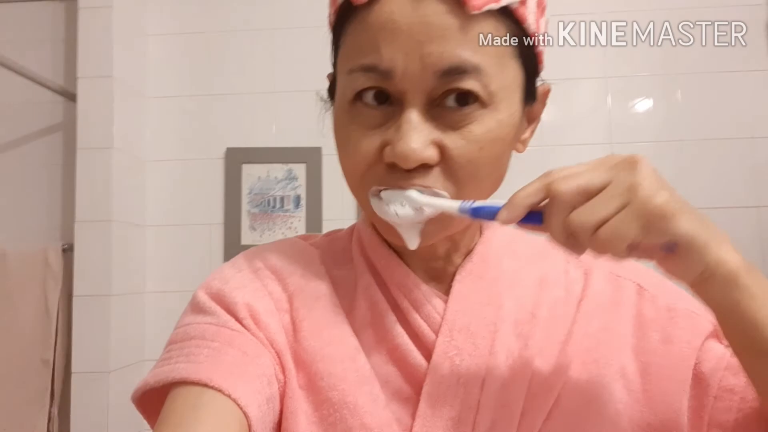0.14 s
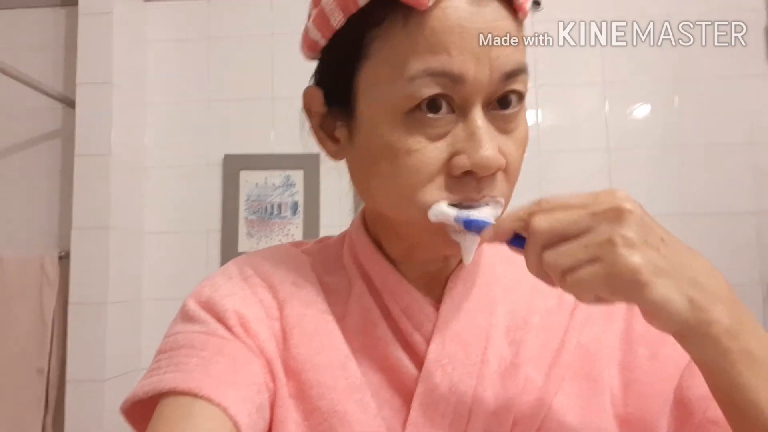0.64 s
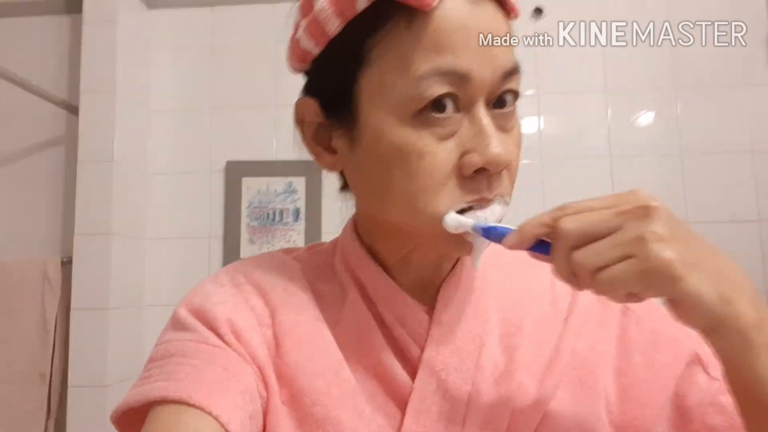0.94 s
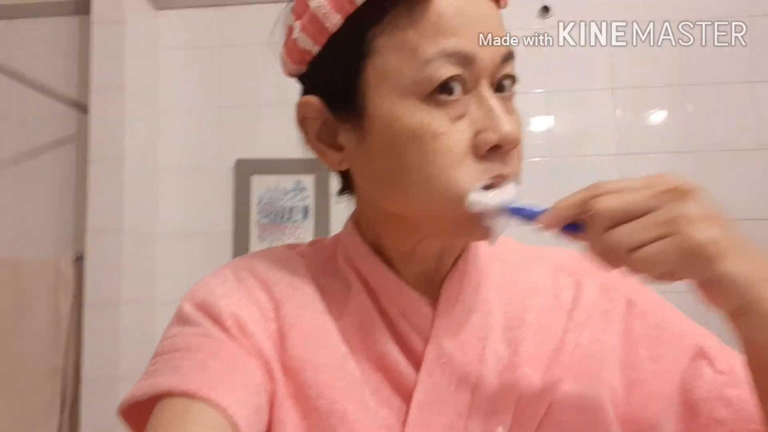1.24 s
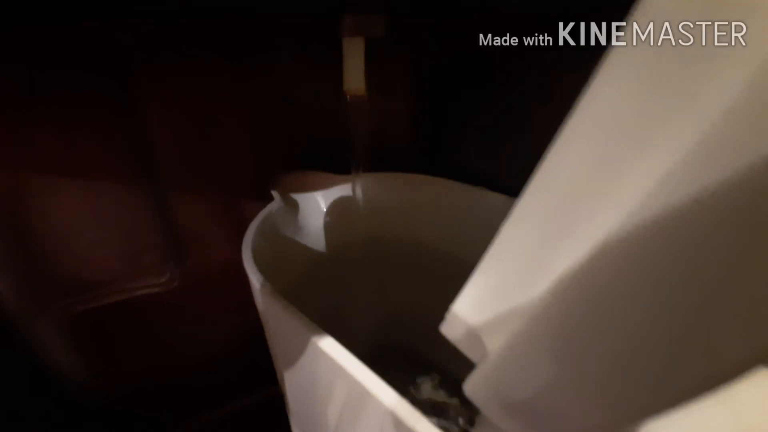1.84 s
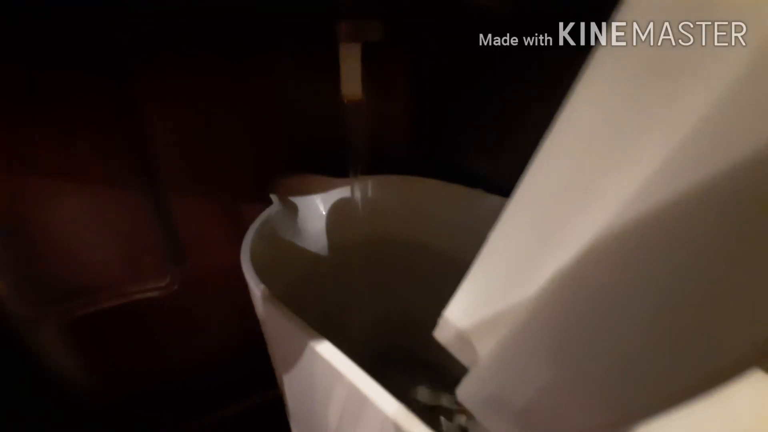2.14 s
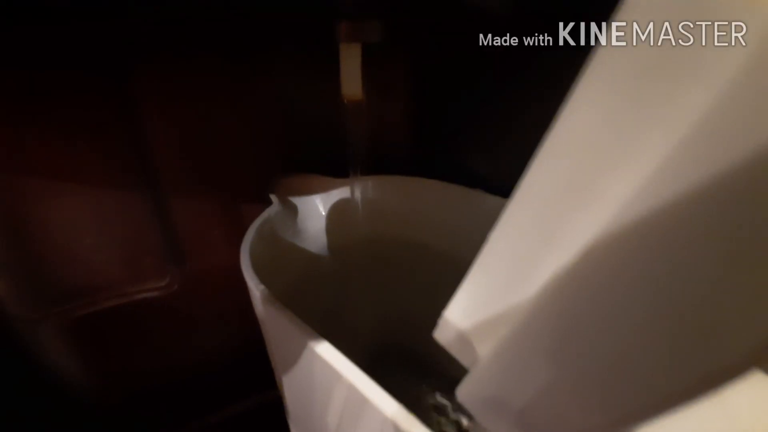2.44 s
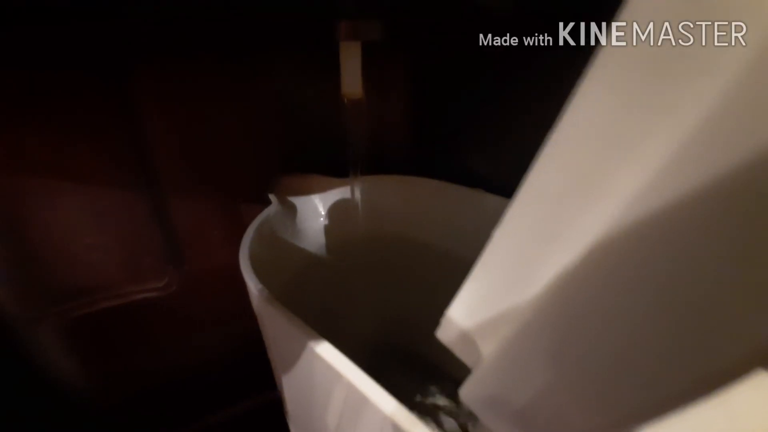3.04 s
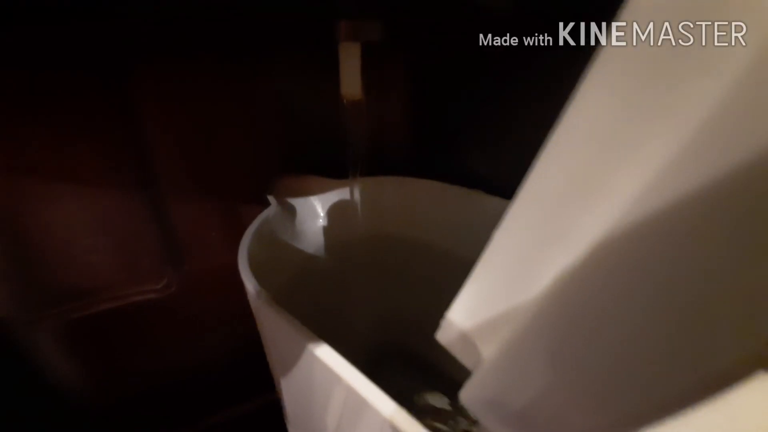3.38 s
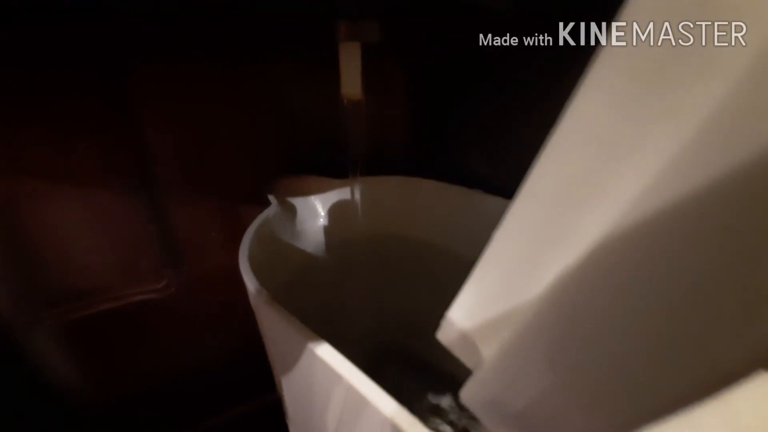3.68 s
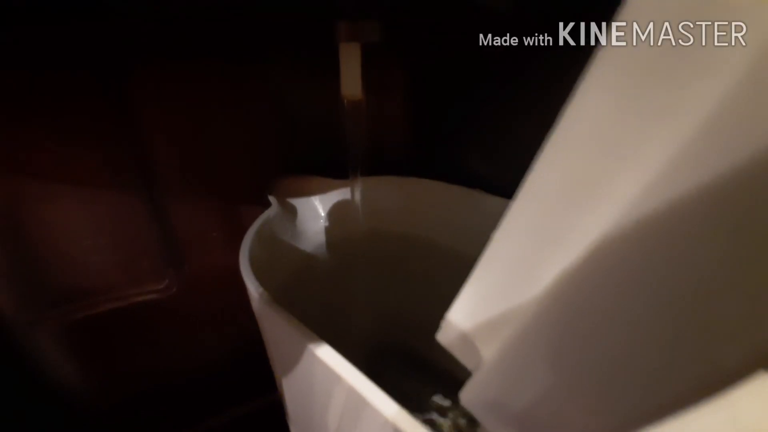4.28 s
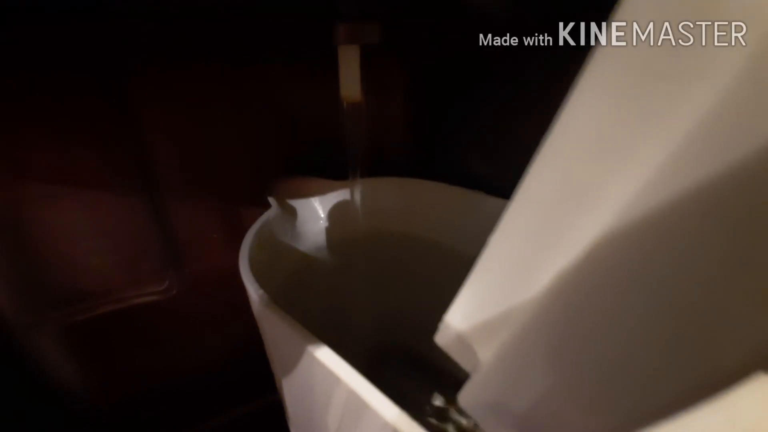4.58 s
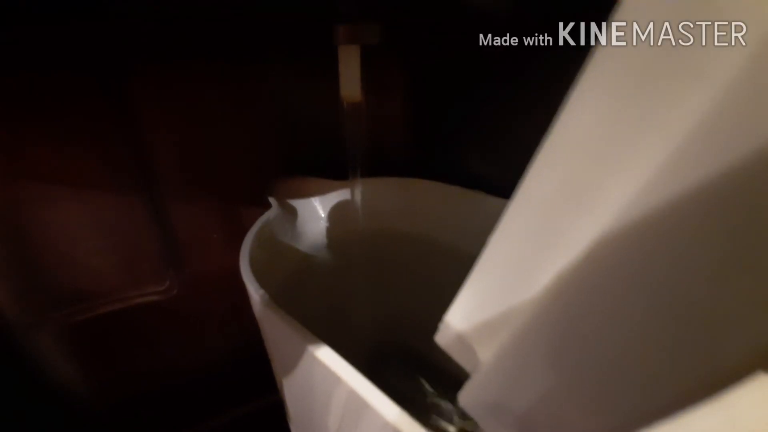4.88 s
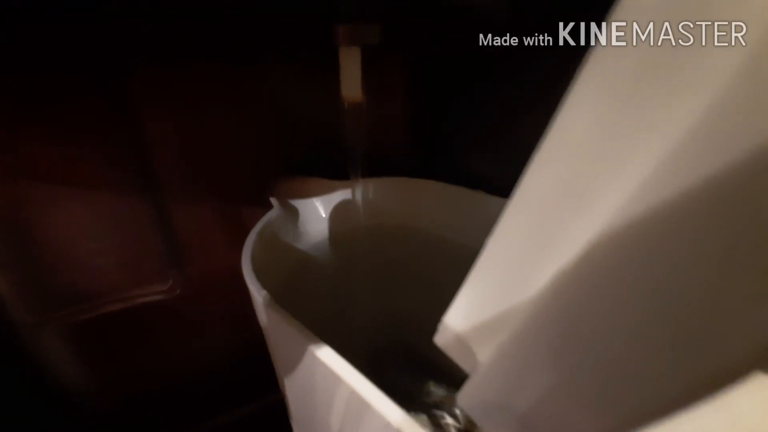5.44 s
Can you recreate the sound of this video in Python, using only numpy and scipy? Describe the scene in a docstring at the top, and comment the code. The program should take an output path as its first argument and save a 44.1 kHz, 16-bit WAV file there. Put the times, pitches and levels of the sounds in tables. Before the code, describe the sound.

Quick, wet toothbrush strokes hiss and tick close by on the left, with a short bathroom echo. They cut off and louder tap water runs into a plastic jug, well to the left, with splashing drops, gurgles and a humming motor underneath. After another brief silence, the low, even rush of a fan is heard to the end.

```python
"""Tiled bathroom: brush, tap, fan

Three moments in stereo, short silences between. Close by, left of the microphone, a toothbrush scrubs
foamy teeth while the mouth opens. Further left, a tap pours into a part-filled plastic jug: drops
spatter and trapped air rings over a motor hum. Then a steady rush, as of a fan, fills the room."""
import sys
import numpy as np
from scipy import signal
from scipy.fft import rfft, irfft, next_fast_len
from scipy.io import wavfile

SR = 44100
rng = np.random.default_rng(int(sys.argv[2]) if len(sys.argv) > 2 else 0)


def inscribe(sig):
    """Save sig as 16-bit PCM at rate SR to the path in sys.argv[1].

    A 1-D sig is mono; a 2-D sig holds one channel per row.
    Samples are clipped to [-1, 1] before scaling.
    """
    pcm = np.round(np.clip(np.atleast_2d(sig).T, -1, 1) * 32767)
    wavfile.write(sys.argv[1], SR, pcm.astype(np.int16))


N = 309563
TIME_S = np.arange(N) / SR


def amp(db):
    """Decibels to gain."""
    return 10 ** (np.asarray(db) / 20)


def rms_one(x):
    """Scale so that the mean of the channels has rms 1."""
    return x / np.sqrt(np.mean(np.atleast_2d(x).mean(axis=0) ** 2) + 1e-20)


def in_time(rows):
    """One curve over time for each column after the first, time_s."""
    times, *columns = np.transpose(rows)
    return [np.interp(TIME_S, times, column) for column in columns]


def during(start_s, end_s, fade_in_s, fade_out_s=0.022):
    """1 inside a span, 0 outside, with straight fades."""
    return np.clip((TIME_S - start_s) / fade_in_s, 0, 1) * np.clip((end_s - TIME_S) / fade_out_s, 0, 1)


def bins():
    """Frequencies of the padded FFT grid."""
    return np.linspace(1e-3, SR / 2, next_fast_len(N // 2 + 8192) + 1)


def at_bins(points):
    """Points (freq_hz, value) joined by straight lines on a log axis."""
    hz, value = np.transpose(points)
    return np.interp(np.log(bins()), np.log(np.sort(hz)), value)


def colour(x, curve_db):
    """Causal (minimum-phase) filter with the given gain on the FFT grid."""
    cepstrum = irfft(np.log(amp(curve_db)))
    size = len(cepstrum)
    cepstrum[1:size // 2] *= 2
    cepstrum[size // 2 + 1:] = 0
    return irfft(rfft(x, size) * np.exp(rfft(cepstrum)))[..., :N]


def drift(rate_hz):
    """A slow random curve with rms 1."""
    step, settle = 40, 2000
    r = np.exp(-2 * np.pi * rate_hz * step / SR)
    noise = rng.standard_normal(N // step + settle + 2)
    slow = signal.lfilter([1], [1, -2 * r, r * r], noise)[settle:]
    return np.interp(np.arange(N) / step, np.arange(len(slow)), rms_one(slow))


def place(x, balance):
    """Share each frequency between the left and right microphone channels."""
    ratio = amp(at_bins(balance))
    size = 2 * (len(ratio) - 1)
    gains = np.array([ratio, np.ones_like(ratio)]) * np.sqrt(2 / (1 + ratio ** 2))
    return irfft(rfft(x, size) * gains)[:, :N]


# How alike the room's diffuse sound is in the two channels: freq_hz, correlation
ROOM_LIKENESS = [(60, 0.98), (150, 0.8), (300, 0.65), (640, 0.26), (1400, 0), (5000, 0)]

def diffuse(spectrum, balance):
    """Stereo noise, alike in the bass and unrelated in the treble; rms 1."""
    alike = at_bins(ROOM_LIKENESS)
    mid, wide = rfft(rng.standard_normal((2, 2 * (len(alike) - 1)))) * amp(at_bins(spectrum))
    stereo = irfft(np.sqrt(1 + alike) * mid + np.sqrt(1 - alike) * wide * [[1], [-1]])
    return rms_one(place(stereo[:, :N], balance))


def tile_echoes(x, t60_s, wet_db):
    """Dense dying reflections off the tiles, different in each channel; the power stays the same."""
    t = np.arange(SR // 2) / SR
    tail = rng.standard_normal((2, len(t))) * amp(-60 * t / t60_s) * (t > .0006)
    tail *= amp(wet_db) / np.sqrt(np.sum(tail ** 2, axis=1, keepdims=True))
    tail[:, 0] = 1  # the direct sound
    return signal.fftconvolve(np.atleast_2d(x), tail, axes=1)[:, :N] / np.hypot(1, amp(wet_db))


def add(out, start_s, sound):
    """Mix in a short stereo sound."""
    i = int(np.clip(start_s * SR, 0, N - 1))
    out[:, i:i + sound.shape[1]] += sound[:, :N - i]


def chance_times(per_s):
    """Random moments over the whole scene."""
    return np.flatnonzero(rng.random(N) < per_s / SR) / SR


def swarm(per_s, low_hz, high_hz, spread_db):
    """Random drops or bubbles, the quiet ones more common: start_s, level_db, pitch_hz."""
    times = chance_times(per_s)
    faintness, pitch = rng.random((len(times), 2)).T
    return np.column_stack([times, -spread_db * np.sqrt(faintness), low_hz * (high_hz / low_hz) ** pitch])


def bursts(times, levels_db, t60_s):
    """Noise bursts that start at once and die away."""
    kicks = np.zeros(N)
    kicks[np.clip(times * SR, 0, N - 1).astype(int)] = amp(levels_db) ** 2
    power = signal.lfilter([1], [1, -amp(-120 / (t60_s * SR))], kicks + 1e-18)
    return np.sqrt(power) * rng.standard_normal(N)


def rings(rows, cycles, rise, swell_cycles):
    """Damped sines (start_s, level_db, pitch_hz) that swell and glide up, each with its stereo phase."""
    out = np.zeros((2, N))
    for (start_s, db, hz), (stretch, steepness, side) in zip(rows, rng.uniform(-1, 1, (len(rows), 3))):
        life_cycles = cycles * amp(4.7 * stretch)
        turns = np.arange(0, life_cycles, hz / SR)
        age = turns / life_cycles
        shape = amp(-60 * age) * (1 - np.exp(-turns / swell_cycles))
        glide = rise * (1 + steepness / 2)
        phase = 2 * np.pi * turns * (1 + glide * (age - 1 / 3) / 2)
        add(out, start_s, amp(db) * shape / shape.max() * np.sin([phase, phase + side * hz / 500]))
    return out


def splashes(rows, t60_s, attack_s, tone, width_hz, alike=0):
    """Noise bursts (start_s, level_db, pitch_hz), each with a resonance; `alike` correlates channels."""
    out, r = np.zeros((2, N)), np.exp(-np.pi * width_hz / SR)
    for (start_s, db, hz), stretch in zip(rows, rng.uniform(-1, 1, len(rows))):
        life_s = t60_s * amp(3 * stretch)
        t = np.arange(0, life_s, 1 / SR)
        shape = amp(-60 * t / life_s) * (1 - np.exp(-(t / attack_s) ** 2))
        mid, wide = rng.standard_normal((2, len(t)))
        noise = np.sqrt((1 + alike) / 2) * mid + np.sqrt((1 - alike) / 2) * wide * [[1], [-1]]
        noise *= shape / shape.max()
        poles = [1, -2 * r * np.cos(2 * np.pi * hz / SR), r * r]
        ring = signal.lfilter([1, 0, -1], poles, noise) * np.sqrt((1 - r * r) / 2)
        add(out, start_s - attack_s / 2, amp(db) * (noise + tone * ring) / np.hypot(1, tone))
    return out


def cavity(x, centre_hz, width_hz):
    """A moving resonance, stepped in short blocks."""
    out, state, r = np.zeros(N), np.zeros(2), np.exp(-np.pi * width_hz / SR)
    for i in range(0, N, 256):
        poles = [1, -2 * r * np.cos(2 * np.pi * centre_hz[i] / SR), r * r]
        out[i:i + 256], state = signal.lfilter([1, 0, -1], poles, x[i:i + 256], zi=state)
    return out


def mouth_ring(flicks, mouth_hz):
    """Two mouth resonances move together; each acts twice, which leaves dark valleys."""
    lower, upper = (rms_one(cavity(cavity(flicks, hz, width_hz), hz, width_hz))
                    for hz, width_hz in [(mouth_hz, 500), (1.31 * mouth_hz, 800)])
    return lower + amp(-4) * upper


# Brush strokes at their hardest contact; frontness runs from 0 (back teeth) to 1 (front teeth):
# contact_s, hiss_db, mouth_db, mouth_hz, frontness, length_s
BRUSH_STROKES = [(0.012, -57.5, -78, 1110, .9, 0.18), (0.134, -54, -82, 1050, .9, .16),
                 (0.246, -56.5, -69.5, 670, .95, 0.18), (0.462, -69, -73, 616, 0.72, 0.23),
                 (0.631, -57.5, -52, 1360, 0.71, .14), (.807, -48.5, -52, 1030, 1, 0.11),
                 (0.912, -62, -49, 1120, 0.62, 0.087), (1.075, -72, -53, 1310, .15, .08),
                 (1.164, -57, -44.5, 1310, 0.16, 0.095), (1.321, -63, -54, 1340, 0.32, 0.28)]

def brush_strokes():
    """Each stroke swells and fades more slowly; mouth pitch and brush position glide between strokes."""
    depth_db, swell_share = 19.5, 0.39
    foam_start_db, foam_fade_db_per_s = -12, 33
    hiss_curves, mouth_curves = [], []
    for contact_s, hiss_db, mouth_db, _, _, length_s in BRUSH_STROKES:
        since_s = TIME_S - contact_s
        age = since_s / length_s
        stroke_db = -depth_db * np.maximum(-age / swell_share, age / (1 - swell_share))
        # foam keeps crackling in the mouth after the stroke
        foam_db = np.where(since_s > 0, foam_start_db - foam_fade_db_per_s * since_s, stroke_db)
        hiss_curves.append(hiss_db + stroke_db)
        mouth_curves.append(mouth_db + np.maximum(stroke_db, foam_db))
    _, _, mouth_hz, frontness, _ = in_time(BRUSH_STROKES)
    mouth_hz *= np.exp(0.044 * drift(18))  # cheek and tongue keep reshaping the mouth
    return np.max(hiss_curves, axis=0), np.max(mouth_curves, axis=0), mouth_hz, frontness


# Bristles on the front teeth, open to the microphone: freq_hz, gain_db
FRONT_BRISTLES = [(300, -13), (700, -1), (1300, -8.5), (2150, 10.5), (2700, -4.5), (3400, 3), (4200, 5.5),
                  (8000, 6.5), (11500, 3), (15500, -9)]
# Bristles on the back teeth, heard through the cheek: freq_hz, gain_db
BACK_BRISTLES = [(300, -7.5), (1000, -12), (2000, 7.5), (2750, 4.5), (3400, 5.5), (4500, -3.5),
                 (8000, -7.5), (10500, -24), (15500, -18)]
# The brushing, left of the microphone: freq_hz, left_minus_right_db
BRUSH_BALANCE = [(100, 10), (380, 1), (700, 5.5), (1290, 2), (2600, 8), (5000, 4.5), (15000, 5.5)]

def toothbrush():
    """Bristles flick over the teeth: a hiss that dulls behind the cheek, and the ring of the mouth."""
    hiss_db, mouth_db, mouth_hz, frontness = brush_strokes()
    times = chance_times(per_s=2200)
    flicks = bursts(times, rng.normal(0, 3.9, len(times)), t60_s=0.0029)
    bright = rms_one(colour(flicks, at_bins(FRONT_BRISTLES)))
    dull = rms_one(colour(flicks, at_bins(BACK_BRISTLES)))
    hiss = amp(hiss_db) * (frontness * bright + (1 - frontness) * amp(9) * dull)
    mouth = amp(mouth_db) * mouth_ring(flicks, mouth_hz)
    return place(tile_echoes(hiss + mouth + bristle_snaps(), t60_s=0.2, wet_db=-0.5), BRUSH_BALANCE)


# Room tone of the bathroom, behind the brushing: freq_hz, gain_db
ROOM_TONE = [(25, -23), (60, -5), (100, 3), (170, -15), (350, -20), (1000, -22.5), (4000, -24),
             (15000, -32)]

def room_air():
    """A low, uneven rumble with a faint mains hum."""
    hum = tones([(100, -74)], waver_db=2, wander_rad=.8) * amp([[2], [-6]])
    rumble = amp(-73.5) * diffuse(ROOM_TONE, BRUSH_BALANCE)
    swell_db, = in_time([(0, 0), (.65, 4), (1.1, 3), (1.38, -0.5)])
    return amp(swell_db) * (rumble + hum)


def tones(lines, waver_db, wander_rad, left_lead_rad=0):
    """Stereo tones (pitch_hz, level_db) that waver in level and phase."""
    out = np.zeros((2, N))
    for hz, db in lines:
        phase = 2 * np.pi * (hz * TIME_S + rng.random()) + wander_rad * drift(2.7)
        out += np.sqrt(2) * amp(db + waver_db * drift(2.2)) * np.sin([phase + left_lead_rad, phase])
    return out


# Tufts snapping off a tooth, close by: start_s, tick_db, mouth_db, mouth_hz
TUFT_SNAPS = [(0.1354, -35, -72, 1150), (0.2707, -34.5, -68, 700), (0.3092, -35.5, -82, 700),
              (0.4968, -38, -84, 900), (0.598, -48, -66, 1280), (0.6296, -33.5, -36, 1260),
              (0.7784, -45, -45, 1200), (0.822, -46, -54, 900), (0.8841, -37, -52, 1130),
              (0.9225, -42, -42.5, 1190), (1.078, -60, -44, 1320), (1.1704, -55, -51, 1320),
              (1.3069, -50, -55, 1400)]
# Colour of the tick: freq_hz, gain_db
TICK_COLOUR = [(200, -22), (900, -9), (2000, 0.5), (9000, 3), (15500, -10)]

def bristle_snaps():
    """A tuft slips off a tooth: a dry tick, and a short knock of the mouth."""
    start_s, tick_db, mouth_db, mouth_hz = np.transpose(TUFT_SNAPS)
    ticks = colour(bursts(start_s, tick_db, t60_s=0.0072), at_bins(TICK_COLOUR))
    knocks = rings(np.column_stack([start_s, mouth_db, mouth_hz]), cycles=13, rise=.02, swell_cycles=1)
    return amp(-4.5) * ticks + amp(7.5) * knocks


# Strength of the stream where it lands in the jug: time_s, spray_db, bubbling_db
TAP_FLOW = [(1.55, -50.5, -45.5), (1.8, -48, -50), (2.25, -48, -46.5), (2.6, -50.1, -49.5), (2.9, -48, -50),
            (3.2, -52, -51), (3.6, -52.5, -50.5), (4.0, -47, -45.5), (4.35, -47, -47), (4.7, -46.5, -47.5),
            (5.0, -46, -44), (5.5, -43.5, -47.5)]

def stream():
    """Spray, fizz and churn levels follow the flow and surge at random; plunges lift the last two."""
    flow_spray_db, bubbling_db = in_time(TAP_FLOW)
    stir = np.max([np.exp(-np.abs(TIME_S - start_s) / 0.043) for start_s, _, _ in JET_PLUNGES], axis=0)
    spray_db = flow_spray_db + 1.9 * drift(14)
    fizz_db = bubbling_db - 2.5 + 2 * drift(10) + 1.5 * stir
    churn_db = bubbling_db - 5.5 + 1.4 * drift(11) + 2.5 * stir
    return spray_db, fizz_db, churn_db


# Resonances and notches of the plastic jug: centre_hz, width_hz, gain_db
JUG_RESONANCES = [(570, 220, -2), (777, 110, 6.5), (937, 126, 11), (1176, 470, -5), (1635, 360, -3.5),
                  (2174, 530, 3.5), (2667, 90, 6), (3986, 225, -12.5), (4695, 340, 6.5), (5270, 590, -6.5),
                  (6100, 270, -7.5), (6620, 240, 7.5), (6900, 61, 0), (7460, 320, -9), (9700, 200, -3.5),
                  (12000, 160, -0.5)]
# The jug, well left of the microphone: freq_hz, left_minus_right_db
TAP_BALANCE = [(60, 5), (200, 5.6), (550, 2.3), (900, 8.6), (1290, 1.8), (2000, 9.4), (2700, 18.2),
               (4000, 11.9), (6600, 17.6), (8500, 11.6), (11000, 12.8), (15000, 14.3)]

def tap():
    """Water sounds pass through the jug's resonances; its wall drums and a motor hums."""
    spray_db, fizz_db, churn_db = stream()
    jug_db = sum(db / (1 + (2 * (bins() - hz) / width_hz) ** 2) for hz, width_hz, db in JUG_RESONANCES)
    water = colour(spray(spray_db) + bubbles(fizz_db) + churning(churn_db), jug_db)
    water = tile_echoes(water, t60_s=0.17, wet_db=-11.5)
    return place(water, TAP_BALANCE) + jug_wall() + motor_hum()


# Colour of the jug's drumming wall: freq_hz, gain_db
WALL_COLOUR = [(20, -17.5), (45, -16), (90, -7), (170, -0.5), (215, -6.5), (255, 0.5), (295, 5),
               (340, -6.5), (430, -11), (560, -12.5), (900, -16.5), (3000, -65)]

def jug_wall():
    """The plastic wall drums unevenly under the stream."""
    wall_db, = in_time([(1.5, -50), (3.2, -51.5), (4.3, -49), (5.5, -48.5)])
    return amp(wall_db + 2.24 * drift(17)) * diffuse(WALL_COLOUR, TAP_BALANCE)


# A motor beside the tap, left of the microphone: pitch_hz, level_db
MOTOR_TONES = [(60, -44.5), (100, -50.5), (120, -61.5), (149.3, -60), (167.7, -53), (180, -63.5),
               (200, -66.5), (240, -60), (249, -62), (298, -67), (500, -73.5)]

def motor_hum():
    """A motor hums in low, nearly steady tones."""
    return tones(MOTOR_TONES, waver_db=0.77, wander_rad=.08, left_lead_rad=0.57) * amp([[2.3], [-2.8]])


# Colour of the spray at the water's surface: freq_hz, gain_db
SPRAY_COLOUR = [(200, -20.5), (600, 1), (1500, -8.5), (3000, 0), (5000, -2.5), (7500, 0), (9000, -0.5),
                (12000, 2.5), (14000, 2), (15500, 0)]

def spray(spray_db):
    """The stream breaks into drops that slap the surface; tiny bubbles tinkle and the foam sizzles."""
    drops = swarm(per_s=190, low_hz=3850, high_hz=15500, spread_db=30.5)
    patter = rms_one(splashes(drops, t60_s=.017, attack_s=.004, tone=1, width_hz=1860))
    tiny_bubbles = swarm(per_s=450, low_hz=4950, high_hz=14160, spread_db=30)
    tinkle = rms_one(rings(tiny_bubbles, cycles=49, rise=.11, swell_cycles=9))
    foam = rms_one(rng.standard_normal((2, N)))
    fine_spray = amp(spray_db) * (amp(-1.36) * patter + amp(-7) * tinkle + amp(-8.5) * foam)
    return colour(fine_spray + amp(-7) * drop_slaps(), at_bins(SPRAY_COLOUR))


# The loudest drops landing in the jug: start_s, level_db, pitch_hz
BIG_DROPS = [(1.4702, -29, 10700), (1.515, -32, 12100), (1.5708, -26.5, 8000), (1.7176, -26, 10600),
             (1.954, -29.5, 4150), (2.0206, -20, 6800), (2.0537, -32, 6940), (2.104, -21.5, 11600),
             (2.2035, -24.5, 9600), (2.2865, -28, 14800), (2.3134, -25.5, 6260), (2.3565, -26, 11000),
             (2.4089, -30, 12000), (2.4704, -34, 14100), (2.5344, -36, 10600), (2.6694, -27.5, 6700),
             (2.8075, -29, 14100), (2.9376, -20.5, 4700), (2.9801, -26, 11700), (3.0185, -34, 12400),
             (3.1068, -27.5, 6610), (3.15, -30.5, 11500), (3.2645, -30.5, 10600), (3.3079, -30, 6620),
             (3.32, -32, 6800), (3.3445, -36, 12000), (3.437, -26, 10100), (3.4623, -30, 13700),
             (3.537, -30.5, 10400), (3.5788, -32, 12600), (3.7492, -21, 6500), (3.8015, -29, 6600),
             (3.8578, -28.5, 6590), (3.937, -21, 10100), (4.0538, -20, 12300), (4.1614, -28, 12100),
             (4.2584, -23, 9050), (4.3799, -28, 12900), (4.412, -25.5, 13700), (4.4945, -17.5, 6620),
             (4.6106, -26.5, 12600), (4.847, -24.5, 6600), (4.9133, -26.5, 13800), (5.1018, -32, 4770),
             (5.1332, -26.5, 11900), (5.256, -36, 14800), (5.4247, -26.5, 12100), (5.44, -22, 6760)]

def drop_slaps():
    """Each big drop slaps the surface and throws up a weaker one that lands just after it."""
    start_s, level_db, pitch_hz = np.transpose(BIG_DROPS)
    delay_s = .007 * (1 + .25 * rng.uniform(-1, 1, len(start_s)))
    rebounds = np.column_stack([start_s + delay_s, level_db - 6, pitch_hz])
    return splashes(np.vstack([BIG_DROPS, rebounds]), t60_s=.018, attack_s=.0034, tone=0.74, width_hz=920)


# The loudest single bubbles in the jug: start_s, level_db, pitch_hz
LOUD_BUBBLES = [(1.5531, -29.5, 2190), (1.6113, -32.5, 2600), (2.151, -28, 3370), (2.2118, -28.5, 2600),
                (2.2326, -28, 2070), (2.4093, -30, 2640), (2.5432, -28, 3280), (2.5671, -28.5, 2160),
                (2.696, -33, 2700), (2.821, -30.5, 2170), (2.9193, -30.5, 2700), (3.1088, -24, 2210),
                (3.4857, -31.5, 2700), (4.0533, -24, 2550), (4.2538, -30.5, 3270), (4.4518, -28.5, 2130),
                (4.4948, -28, 2630), (4.9791, -29.5, 2690), (5.1033, -28.5, 2760), (5.256, -30.5, 2750),
                (5.3458, -30.5, 2730), (5.5008, -32.5, 2750)]

def bubbles(fizz_db):
    """Trapped air rings and rises in pitch as it nears the surface; torn bubbles only splutter."""
    small = swarm(per_s=380, low_hz=1256, high_hz=4426, spread_db=24.5)
    chirps = rms_one(rings(small, cycles=32.4, rise=0.23, swell_cycles=2.4))
    torn = swarm(per_s=220, low_hz=1270, high_hz=3540, spread_db=22.5)
    splutter = rms_one(splashes(torn, t60_s=.02, attack_s=.0012, tone=8, width_hz=480))
    fizz = amp(fizz_db) * (amp(-3.5) * chirps + amp(-5.5) * splutter)
    # a loud bubble tears loose with a wet smack
    smacks = splashes(LOUD_BUBBLES, t60_s=.02, attack_s=.0012, tone=2.6, width_hz=1200)
    plinks = rings(LOUD_BUBBLES, cycles=39.4, rise=0.3, swell_cycles=1.8)
    return fizz + amp(-1) * plinks + amp(-7) * smacks


# The jet plunging and shaking the air in the jug: start_s, level_db, pitch_hz
JET_PLUNGES = [(1.571, -29.5, 967), (1.621, -29.5, 964), (1.839, -33, 950), (2.027, -33, 944),
               (2.184, -29.5, 837), (2.262, -29, 889), (2.534, -35.5, 927), (2.816, -35.5, 920),
               (2.848, -32, 950), (2.939, -29, 740), (3.108, -31.5, 698), (3.36, -30.5, 948),
               (3.854, -32, 910), (3.937, -30, 997), (4.053, -23.5, 950), (4.293, -34.5, 930),
               (4.496, -25, 900), (4.552, -33, 888), (4.752, -30, 770), (4.859, -32.5, 777),
               (5.134, -33.5, 814), (5.172, -34.5, 940), (5.414, -33, 813)]

def churning(churn_db):
    """The jet digs pockets in the water that close with a ringing plop and a splash."""
    pockets = swarm(per_s=190, low_hz=646, high_hz=1230, spread_db=15)
    gurgle = rms_one(splashes(pockets, t60_s=.022, attack_s=.0011, tone=5.4, width_hz=200, alike=.69))
    splash = splashes(JET_PLUNGES, t60_s=.041, attack_s=.0014, tone=0.16, width_hz=360, alike=.69)
    dull_db = at_bins([(150, -8.5), (450, -3), (750, -4.5), (1500, 0.5), (3500, -7.5), (9000, -16)])
    plops = rings(JET_PLUNGES, cycles=30, rise=0.16, swell_cycles=0.71)
    return amp(churn_db - 3) * gurgle + amp(-6.5) * plops + amp(1) * colour(splash, dull_db)


# The fan's rush, filling the room: time_s, level_db
RUSH_LEVEL = [(5.72, -63.5), (5.826, -56), (6.076, -54.5), (6.154, -56.5), (6.3, -53), (6.35, -56.5),
              (7.0, -53.5)]
# Colour of the rush: freq_hz, gain_db
RUSH_COLOUR = [(18, -47), (30, -22), (71, -23), (144, -6.5), (177, -9), (292, -6), (673, -12), (1080, -24),
               (1330, -20), (1440, -21.5), (3150, -32), (6720, -34.5), (8500, -46), (9190, -45),
               (15500, -46)]
# The rush around the microphone: freq_hz, left_minus_right_db
RUSH_BALANCE = [(60, 17), (200, 4), (700, 0.5), (2400, 0.5), (4000, -6), (6200, -17), (7200, -7),
                (8500, 15), (10000, 6), (14000, 0)]
# The fan's blades and motor: pitch_hz, level_db
BLADE_AND_MOTOR_TONES = [(59.5, -78), (100, -72), (150, -64.5), (226, -70.5), (300, -65), (393.5, -66.5),
                         (500, -71), (1303, -77.5), (1351, -96)]

def fan():
    """Rushing air, with blade and motor tones that follow its level."""
    rush_db, = in_time(RUSH_LEVEL)
    rush = amp(rush_db - 1.3) * diffuse(RUSH_COLOUR, RUSH_BALANCE)
    swell_db = rush_db - np.median(np.array(RUSH_LEVEL)[:, 1])
    motor = amp(swell_db) * tones(BLADE_AND_MOTOR_TONES, waver_db=2, wander_rad=0.44)
    return rush + motor * amp([[.5], [-1.5]])


# A thin whine over the fan, well left of the microphone: pitch_hz, level_db
WHINE_TONES = [(4590, -84), (6900, -83), (9189, -84), (11488, -87)]

def whine():
    """Faint high tones come in, flicker and fade."""
    partials = tones(WHINE_TONES, waver_db=2, wander_rad=8)
    flicker = amp(1.9 * drift(24.5))
    return partials * flicker * during(6.1, 7.2, fade_in_s=.08, fade_out_s=0.54) * amp([[1], [-13]])


def scene():
    """Brushing, the running tap, then the fan."""
    brushing = (toothbrush() + room_air()) * during(-.01, 1.386, fade_in_s=.005)
    pouring = tap() * during(1.4487, 5.598, fade_in_s=.083)
    rushing = (fan() + whine()) * during(5.69, 7.1, fade_in_s=.034)
    return brushing + pouring + rushing


def record(dry):
    """The recorder adds a trace of hiss and cuts the highest treble."""
    hiss = amp(-104) * rng.standard_normal((2, N))
    lowpass = signal.ellip(10, .2, 80, 15700, fs=SR, output="sos")
    return signal.sosfilt(lowpass, dry + hiss)


dry = scene()
out = record(dry)
inscribe(out)
```